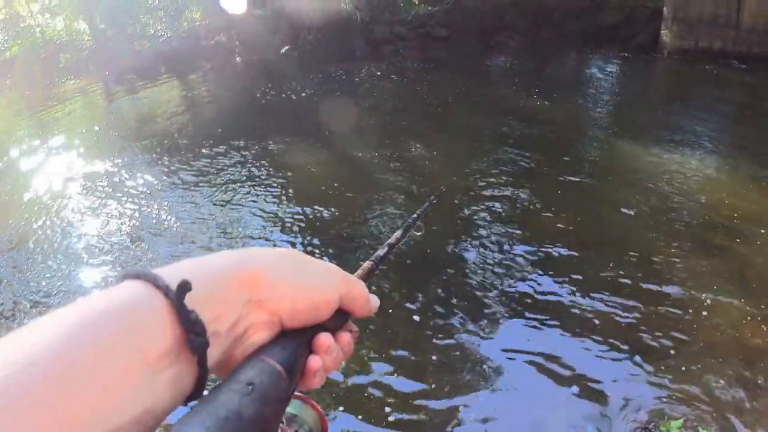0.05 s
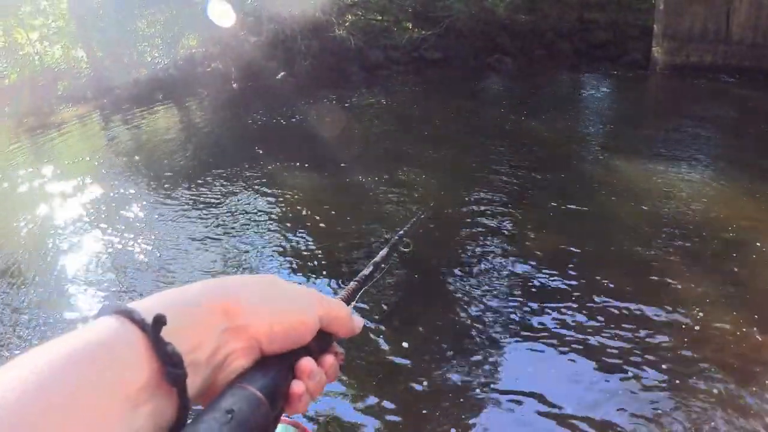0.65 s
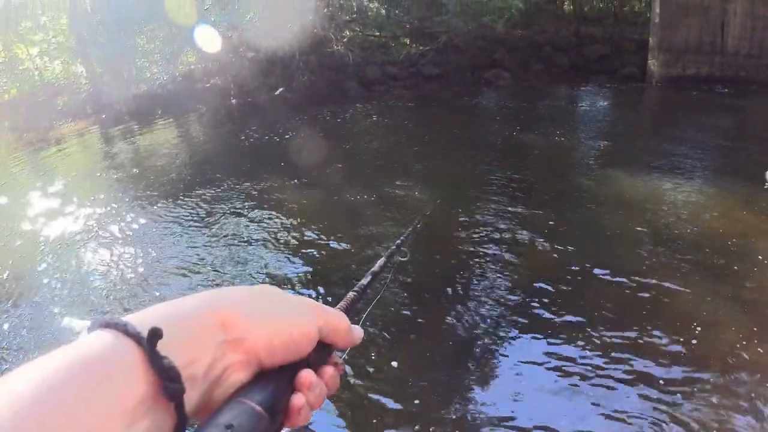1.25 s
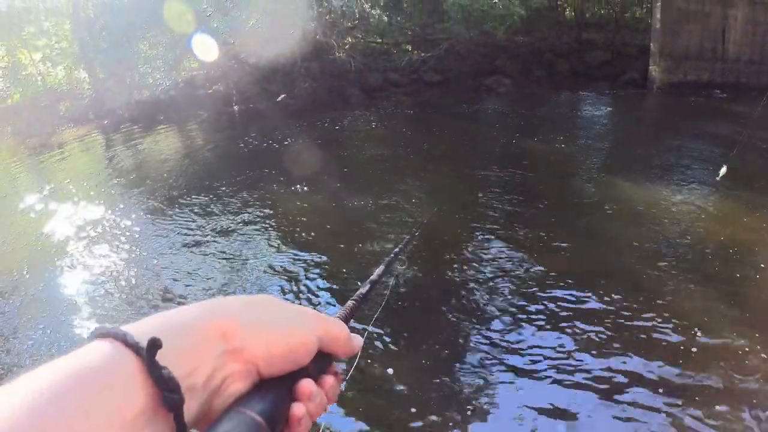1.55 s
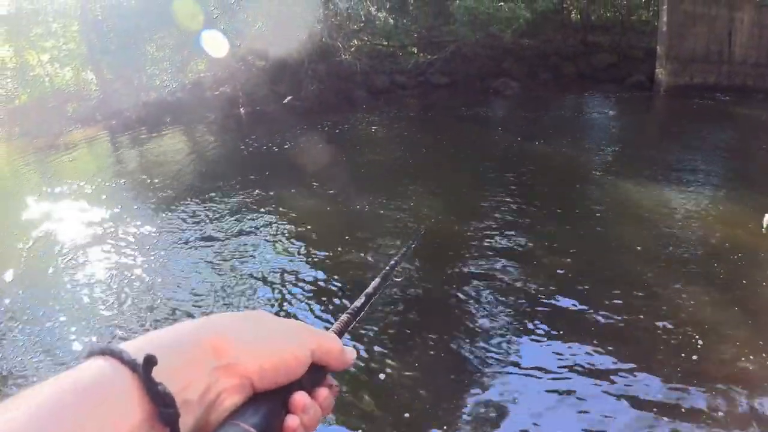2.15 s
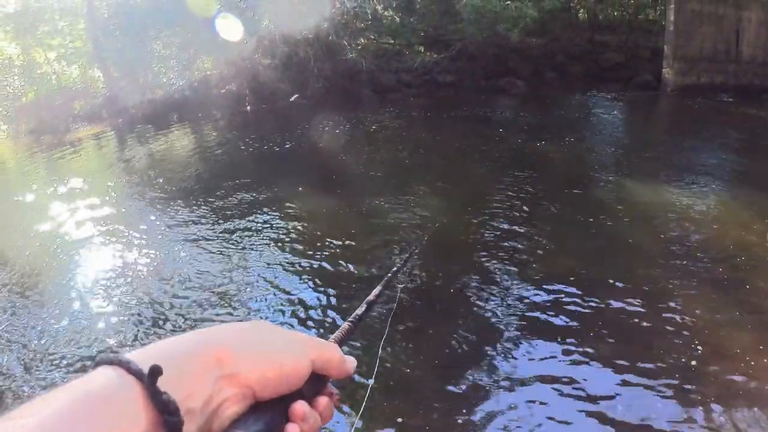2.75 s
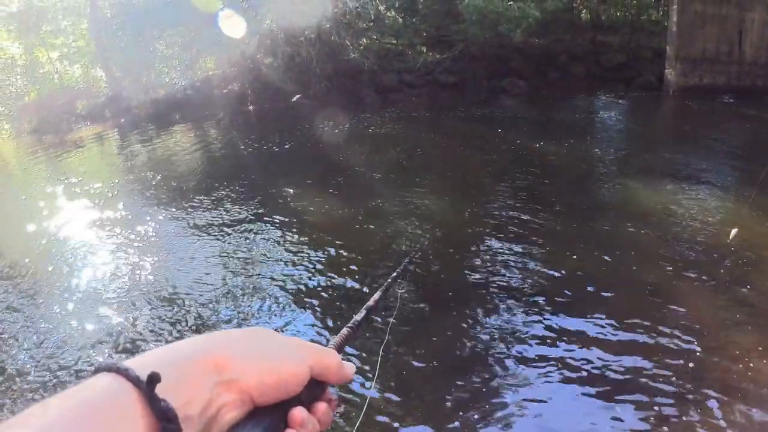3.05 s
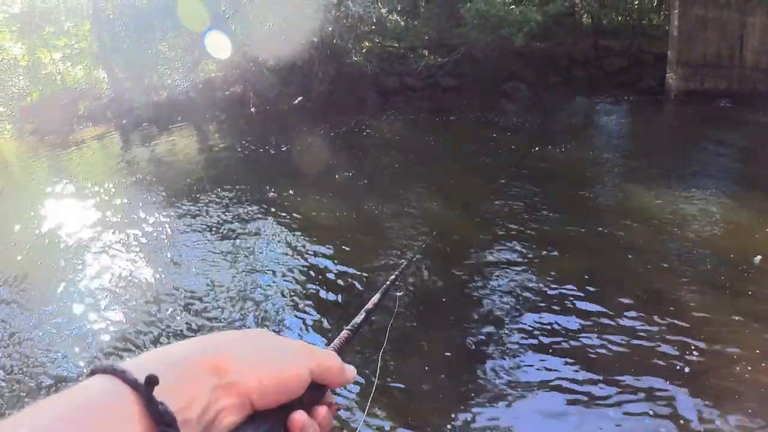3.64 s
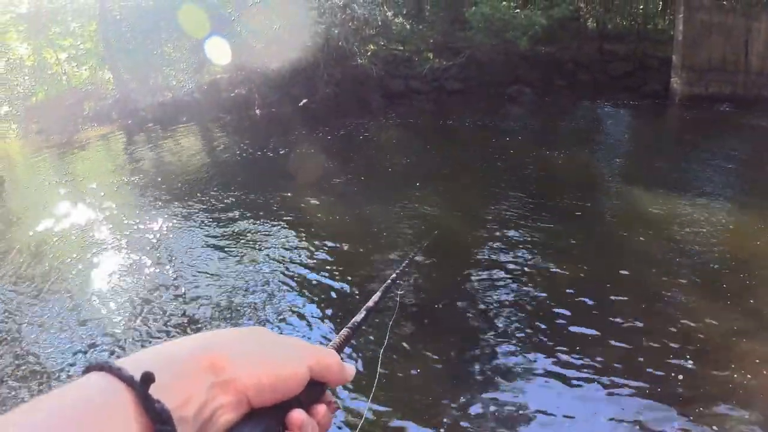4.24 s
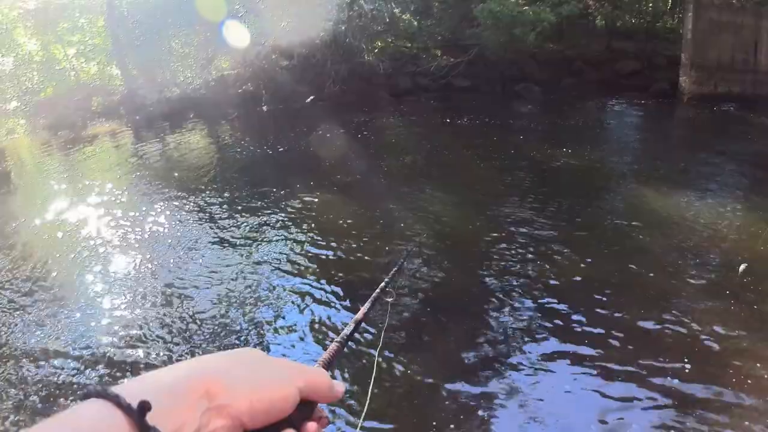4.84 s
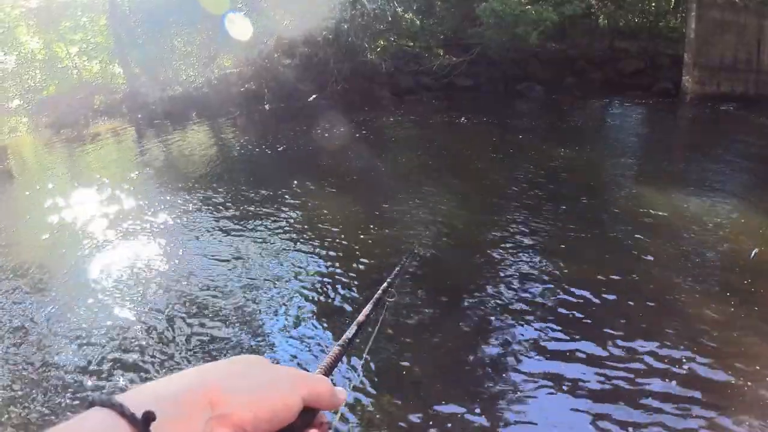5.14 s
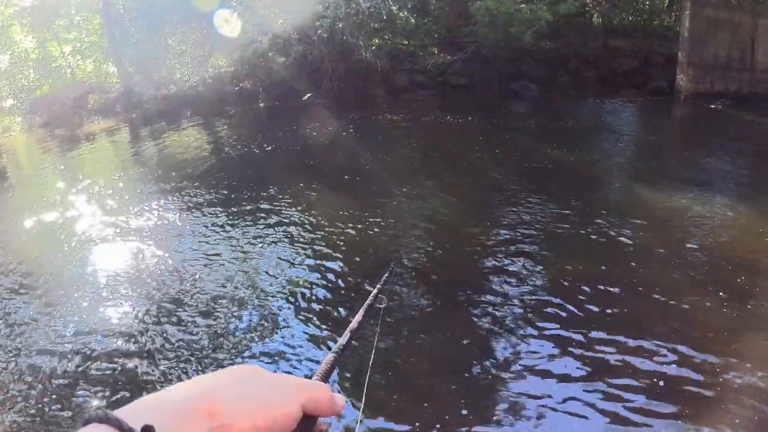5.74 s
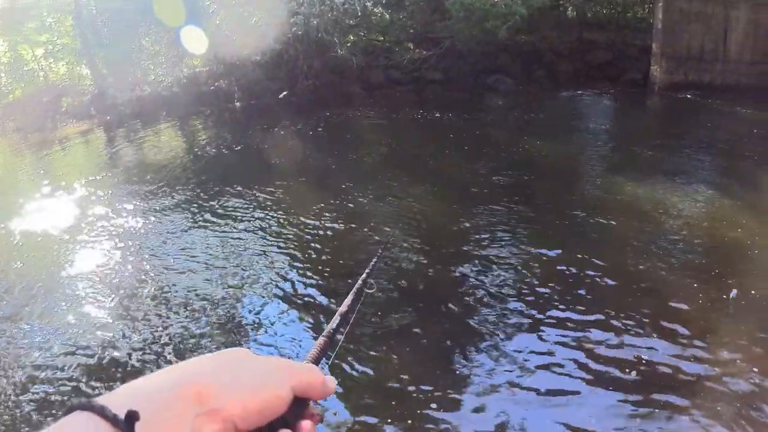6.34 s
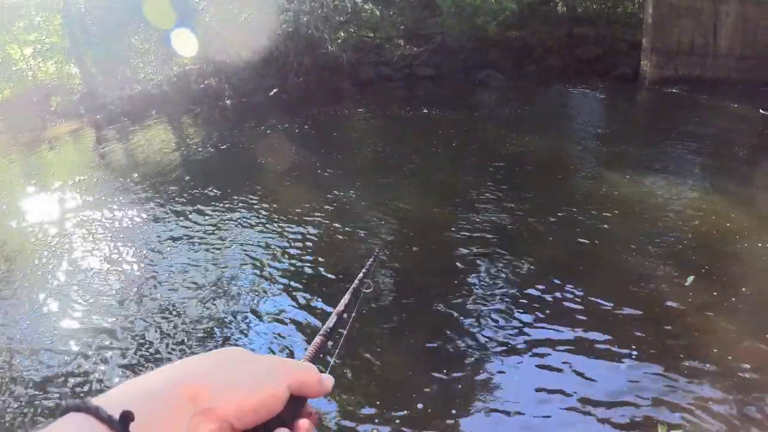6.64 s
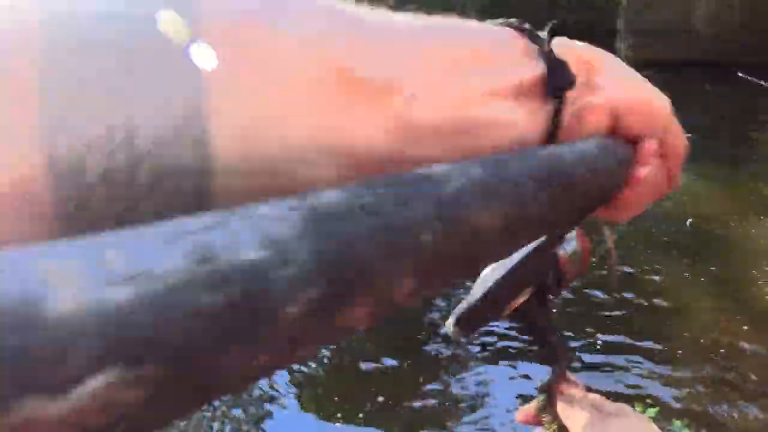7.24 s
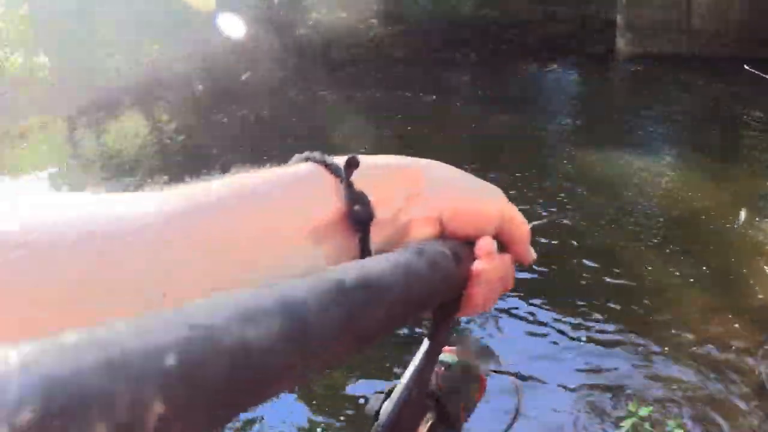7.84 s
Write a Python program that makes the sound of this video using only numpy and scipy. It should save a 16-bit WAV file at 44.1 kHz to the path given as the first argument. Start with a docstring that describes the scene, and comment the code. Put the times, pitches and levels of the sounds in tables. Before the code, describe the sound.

Water pours through a spillway into a river for the whole eight seconds or so, a steady churning roar with bubbles gurgling within it. It sounds dull and muffled, heard outdoors from a body-worn microphone, with only the faintest hiss on top. Its tone shifts slightly during the first second and a half, then settles. A low rumble swells and sinks unevenly underneath throughout. A distant engine's low drone wavers in and out, strongest in the first two seconds, then fading. Soft, deep thuds sit in the rumble: one at about 1.7 seconds, an irregular run from 2.6 to 5 seconds, and a last one near 7 seconds. A few barely audible drops plink at around 3.5 and 4.1 seconds. The rush lifts very slightly near 6.3 and 7.1 seconds and carries on to the end.

```python
"""On the river below a spillway, water pours steadily, dull and muffled at a body-worn microphone.
The rush is a roar of noise with ringing bubbles in it, coloured by reflections off the river's surface
and an arm settling in front of the microphone. A low rumble swells and thuds underneath, a distant
engine's drone fades away, a faint hiss sits on top and a few drops plink nearby."""
import sys
import numpy as np
from scipy import signal
from scipy.fft import rfft, irfft, next_fast_len
from scipy.io import wavfile
from scipy.ndimage import map_coordinates

SR = 44100
rng = np.random.default_rng(int(sys.argv[2]) if len(sys.argv) > 2 else 0)


def waveform_to_disk(signal):
    """Save audio, clipped to [-1, 1], as 16-bit WAV at the path in sys.argv[1]."""
    frames = np.transpose(np.atleast_2d(signal))
    scaled = np.clip(frames, -1, 1) * 32767
    samples = np.round(scaled).astype(np.int16)
    wavfile.write(sys.argv[1], SR, samples)


N = 347949


def from_db(db):
    """Decibels to gain."""
    return 10 ** (np.asarray(db) / 20)


def unit_rms(x):
    """Scale to an rms of 1."""
    return x / np.sqrt(np.mean(x ** 2) + 1e-20)


def automation(rows):
    """Join timed breakpoints into one curve for each column after the time."""
    times, *columns = np.transpose(rows)
    return [np.interp(np.arange(N) / SR, times, column) for column in columns]


def coloured(x, spectrum):
    """EQ a flat sound to a spectrum, rolling off beyond both ends; rms 1."""
    hz, level_db = np.transpose(spectrum)
    size = next_fast_len(N)
    f = np.maximum(np.fft.rfftfreq(size, 1 / SR), 1)
    gain = from_db(np.interp(np.log(f), np.log(hz), level_db))
    roll_off = np.minimum(f / hz[0], 1) ** 2 * np.minimum(hz[-1] / f, 1) ** 2
    return unit_rms(irfft(rfft(x, size) * gain * roll_off, size)[:N])


def drift(rate_hz):
    """Smooth random modulation, mostly slower than rate_hz; rms 1."""
    f = np.fft.rfftfreq(N, 1 / SR)
    return unit_rms(irfft(rfft(rng.standard_normal(N)) / (1 + (f / rate_hz) ** 2), N))


def bubbles(per_s, cycles, size_spread_db, pitches=28):
    """Air dragged under rings as bubbles of all sizes, each for a few cycles; rms 1."""
    out = np.zeros(N)
    for hz in np.geomspace(170, 4500, pitches):
        born = rng.random(N) < per_s / pitches / SR
        sizes = from_db(size_spread_db * np.minimum(rng.exponential(1, N), 4))
        decay = from_db(-60 * hz / (cycles * SR))
        resonator = [1, -2 * decay * np.cos(2 * np.pi * hz / SR), decay * decay]
        rings = signal.lfilter([1, 0, -1], resonator, born * sizes + 1e-18)
        out += np.sqrt(hz) * unit_rms(rings)   # equal power per Hz
    return unit_rms(out)


# The dark tone of the falling water. Each row: frequency in Hz, level in dB per Hz.
RUSH_SPECTRUM = [(110, -0.5), (170, -1), (310, 0.7), (390, -1.5), (540, 0.07), (760, -7), (900, -13.5),
                 (1020, -14), (1260, -20), (1360, -24), (1650, -28.5), (2200, -39.5), (2800, -44.5),
                 (3400, -52.5), (3800, -58), (4200, -57.7), (4600, -61.5), (5100, -67.5), (6000, -74)]
# The rush swells and eases slightly. Each row: time in seconds, gain in dB.
RUSH_SWELL = [(0, 0), (3.0, 0.44), (3.8, 0), (5.9, -0.1), (6.3, 1.25), (6.7, 0), (7.1, 0.9), (7.8, .2)]


def spillway():
    """Countless collapses merge into a churning roar; the larger bubbles gurgle within it."""
    swell_db, = automation(RUSH_SWELL)
    roar = from_db(-30.5) * coloured(rng.standard_normal(N), RUSH_SPECTRUM)
    gurgle = from_db(-36.5) * coloured(bubbles(per_s=2500, cycles=16, size_spread_db=2.0), RUSH_SPECTRUM)
    churn_db = 0.31 * drift(rate_hz=14)
    return from_db(swell_db + churn_db) * (roar + gurgle)


def delayed(x, delay_ms):
    """A delay line whose time can glide."""
    return map_coordinates(x, [np.arange(N) - delay_ms * SR / 1000], order=3, mode="nearest")


# Reflections off the arm, hand and wrist. Each row: time in seconds, delay in ms, strength as a gain.
ARM_BOUNCE = [(0, 0.56, 0.35), (.35, 0.63, 0.3), (.7, 0.56, 0.21), (1.1, 0.62, 0.26), (1.5, 0.67, 0.25),
              (4.5, 0.69, 0.18), (7.8, 0.65, 0.24)]
HAND_BOUNCE = [(0, 0.72, 0.15), (.35, 0.86, 0.15), (.7, 0.76, .09), (1.501, 0.84, 0.056), (4.5, 0.97, .08),
               (7.8, 0.87, 0.042)]
# Negative strength is sound bent round the wrist, arriving inverted; it reflects as the wrist sinks.
WRIST_BOUNCE = [(0, .91, 0.037), (.35, 0.95, -0.16), (.7, 1.01, .13), (1.1, 1.08, .21), (1.5, 1.13, 0.078),
                (7.8, 1.12, 0.15)]


def reflections(x):
    """River and arm comb-filter the rush; the arm's notches slide down as it eases to rest."""
    out = x + 0.062 * delayed(x, delay_ms=3.88)   # off the river's surface
    shade = 1
    for reflector in (ARM_BOUNCE, HAND_BOUNCE, WRIST_BOUNCE):
        delay_ms, strength = automation(reflector)
        out += strength * delayed(x, delay_ms)
        shade += 0.5 * np.abs(strength)   # what reflects also stands in the way
    return out / shade


# The weight under the rush. Each row: frequency in Hz, level in dB per Hz.
RUMBLE_SPECTRUM = [(20, -29), (30, -22), (42, -10.5), (55, -5), (68, -3), (85, -1), (108, -3), (130, -6.5),
                   (170, -13.5), (260, -34)]
# The rumble's fader ride. Each row: time in seconds, level in dB before the trim.
RUMBLE_SWELL = [(0, -40.5), (.52, -38.5), (.7, -33), (1.1, -34), (1.25, -36.5), (2.25, -37), (2.5, -33.5),
                (3.4, -35.5), (3.7, -36), (4.3, -33.5), (4.7, -42), (5, -33), (5.25, -41), (5.6, -36),
                (6.2, -38), (6.5, -33), (6.85, -37.5), (7.1, -31.5), (7.45, -39.5), (7.85, -35.5)]


def rumble(trim_db):
    """Deep turbulence swells and sinks."""
    swell_db, = automation(RUMBLE_SWELL)
    return from_db(swell_db + trim_db) * coloured(rng.standard_normal(N), RUMBLE_SPECTRUM)


# The far-off drone comes and goes as it fades. Each row: time in seconds, level in dB.
ENGINE_FADE = [(0, -34.5), (.23, -34.5), (.31, -26.5), (.41, -36.5), (.5, -25), (.64, -33), (.77, -29),
               (1.0, -34), (1.2, -30.5), (1.9, -35.5), (2.05, -45.5), (2.2, -34.5), (2.7, -42.5),
               (3.08, -34), (3.36, -47), (3.53, -31), (3.72, -37), (4.25, -40.5), (4.47, -34), (5.4, -39),
               (7.8, -40)]


def engine(firing_hz, waver_db, wander_hz):
    """Only the engine's firing tone carries this far, wavering on its way."""
    level_db, = automation(ENGINE_FADE)
    phase = 2 * np.pi * np.cumsum(firing_hz + wander_hz * drift(rate_hz=3.5)) / SR
    return from_db(level_db + waver_db * drift(rate_hz=10.0)) * np.sqrt(2) * np.sin(phase)


# A thin sheen of hiss on top. Each row: frequency in Hz, level in dB per Hz.
HISS_SPECTRUM = [(3000, -6), (7000, -19), (8200, -5), (9500, 3), (11000, -2), (13500, -15)]


def hiss(level_db, hiss_waver_db):
    """A faint high hiss, its level wavering slightly at random."""
    gain = from_db(level_db + hiss_waver_db * drift(rate_hz=16))
    return gain * coloured(rng.standard_normal(N), HISS_SPECTRUM)


# Dull thuds in the rumble. Each row: start in seconds, peak level in dB, pitch in Hz.
THUD_HITS = [(1.723, -23.5, 70.4), (2.611, -22, 61), (2.838, -22.5, 75), (3.035, -20.5, 100.5),
             (3.335, -24.5, 57.7), (3.591, -19, 95), (4.116, -20.5, 79), (4.196, -25, 93),
             (4.267, -18.5, 78.7), (4.489, -24, 91), (4.9, -23.5, 100), (5.04, -25, 68.4),
             (7.062, -24, 64.5)]


def thuds(rise_s):
    """Soft low pushes die within a few cycles."""
    out = np.zeros(N)
    for start, peak_db, hz in THUD_HITS:
        age = np.maximum(np.arange(N) / SR - start, 0)
        envelope = (age / rise_s * np.exp(1 - age / rise_s)) ** 2
        out += from_db(peak_db) * envelope * np.sin(2 * np.pi * hz * age)
    return out


# Drops hit the river nearby. Each row: start in seconds, peak level in dB, starting pitch in Hz.
DRIP_PLINKS = [(3.441, -61.5, 3270), (3.519, -77, 9060), (4.098, -80, 9400)]


def drips(ring_s, rise_hz_per_s):
    """Each drop traps a tiny bubble, which rings briefly and rises in pitch."""
    out = np.zeros(N)
    for start, peak_db, hz in DRIP_PLINKS:
        age = np.maximum(np.arange(N) / SR - start, 0)
        envelope = from_db(peak_db - 60 * np.minimum(age / ring_s, 5))
        out += envelope * np.sin(2 * np.pi * (hz + rise_hz_per_s * age / 2) * age)
    return out


def scene():
    """The rush, the low end and the faint top end, mixed to mono."""
    low_end = rumble(trim_db=2.5) + engine(firing_hz=105, waver_db=0.5, wander_hz=0.7)
    low_end += thuds(rise_s=0.013)
    rush = reflections(spillway())
    top_end = hiss(level_db=-91.5, hiss_waver_db=1.5) + drips(ring_s=0.032, rise_hz_per_s=15000)
    return (rush + low_end + top_end)[None]


def record(dry):
    """A steep low-pass takes off the very top."""
    stop_hz = 14200
    return signal.sosfilt(signal.cheby2(12, 70, stop_hz, fs=SR, output="sos"), dry)


dry = scene()
out = record(dry)
waveform_to_disk(out)
```